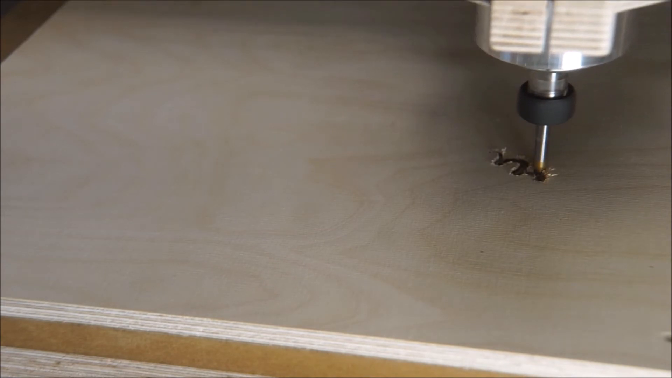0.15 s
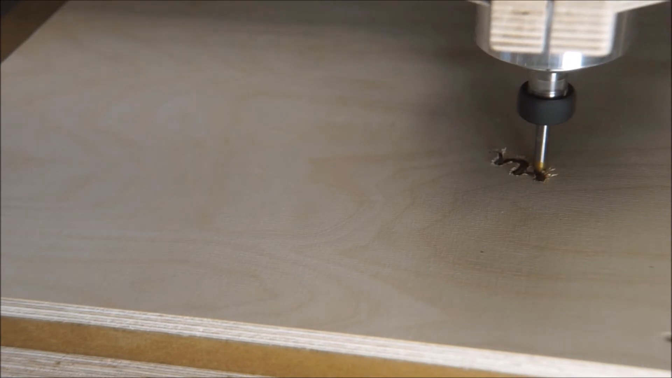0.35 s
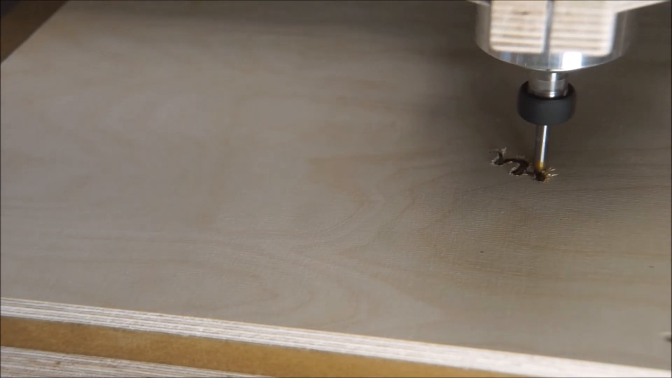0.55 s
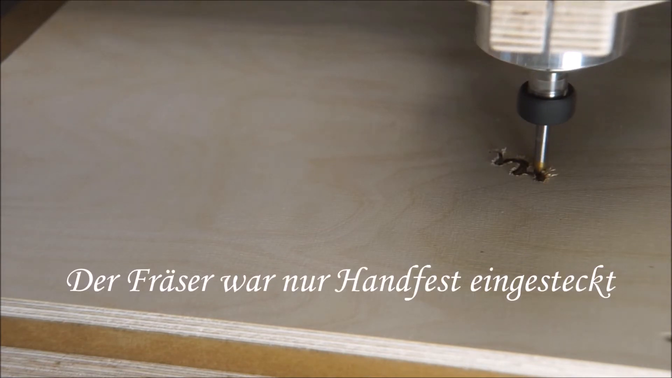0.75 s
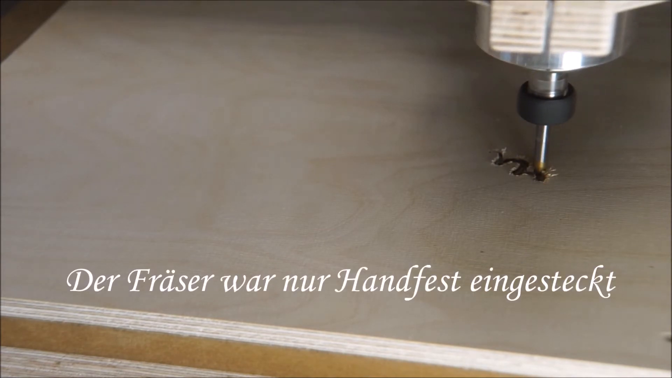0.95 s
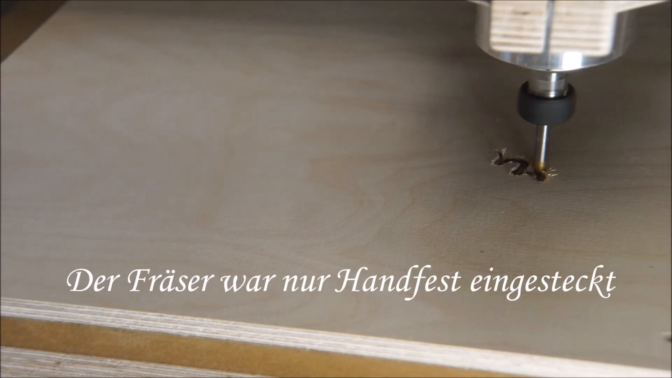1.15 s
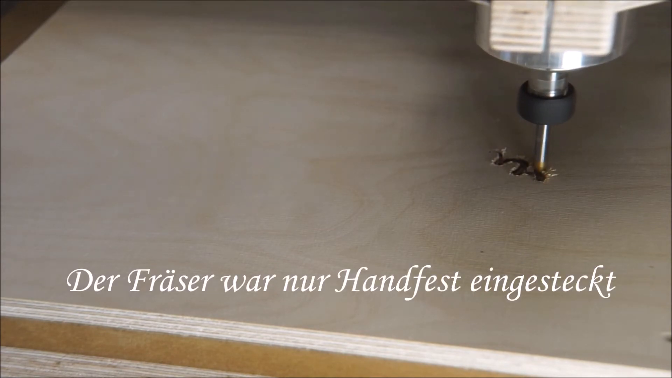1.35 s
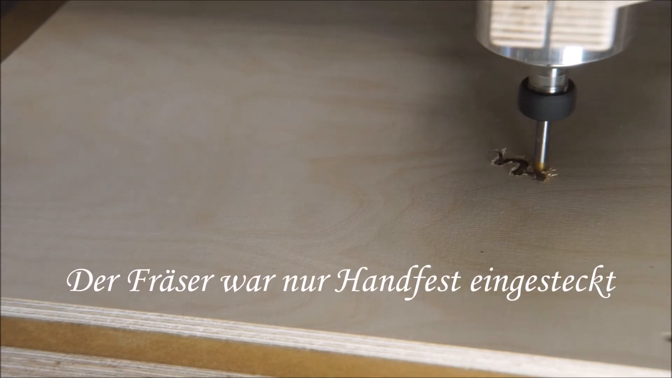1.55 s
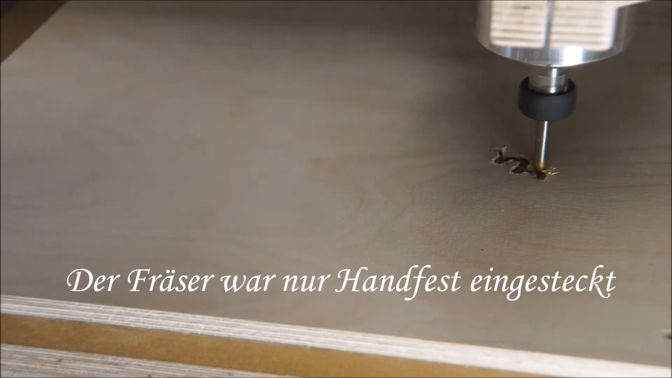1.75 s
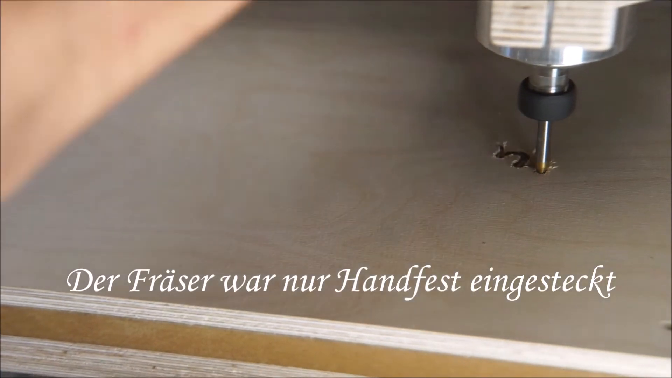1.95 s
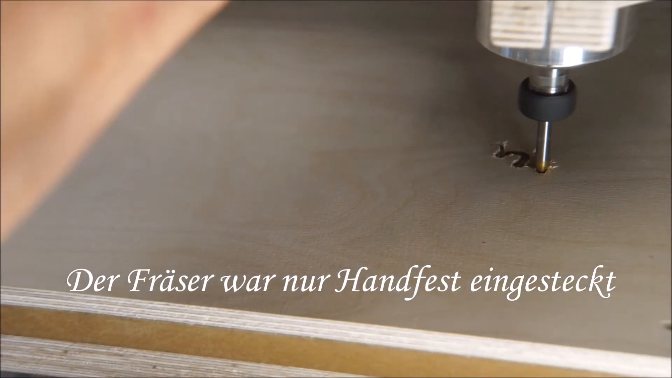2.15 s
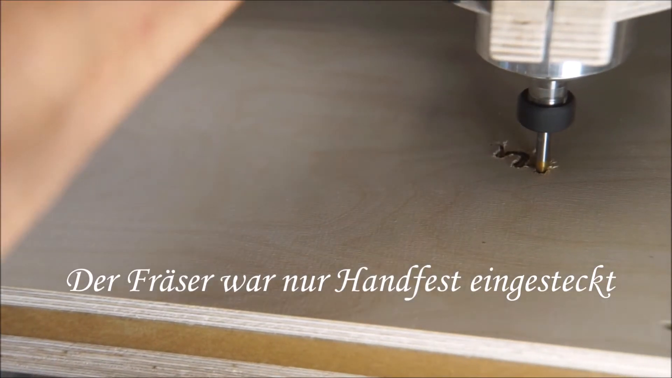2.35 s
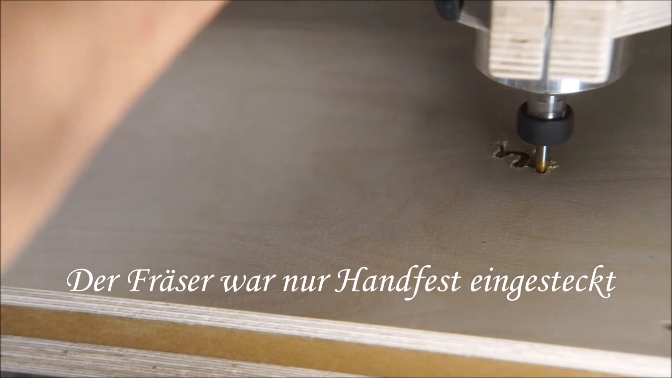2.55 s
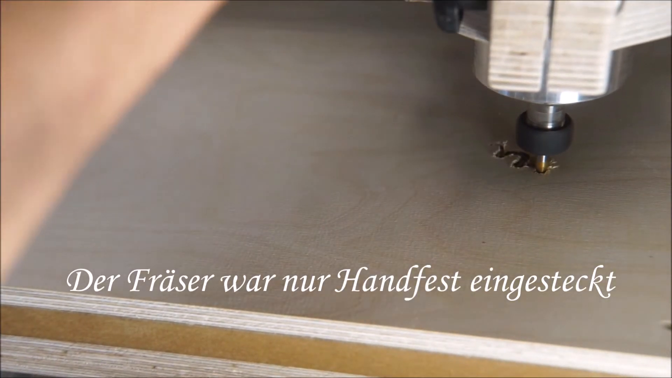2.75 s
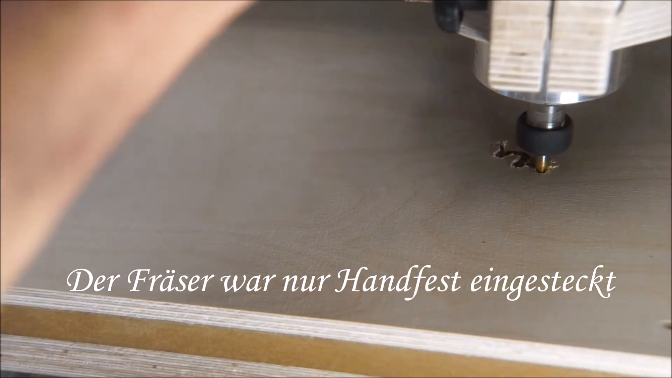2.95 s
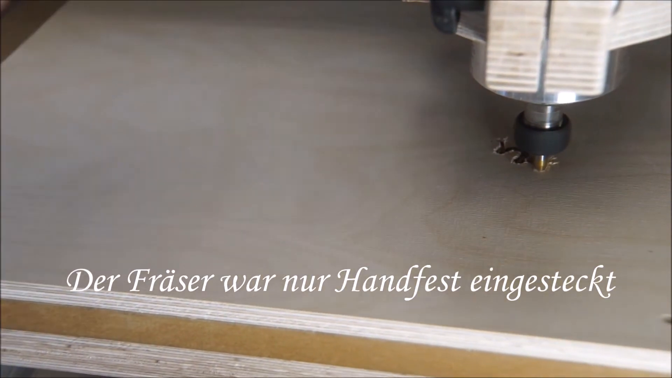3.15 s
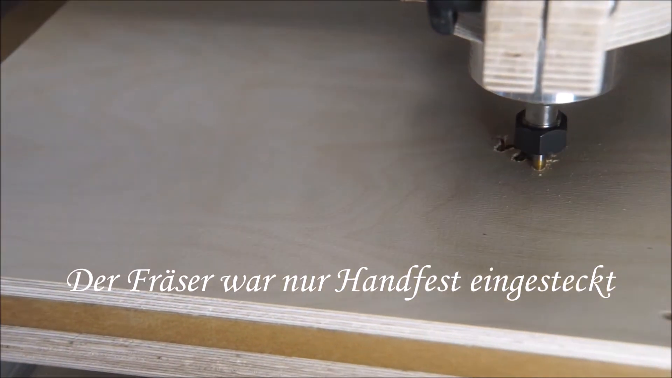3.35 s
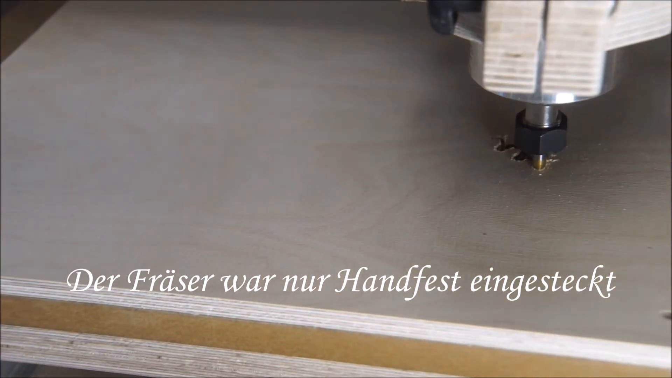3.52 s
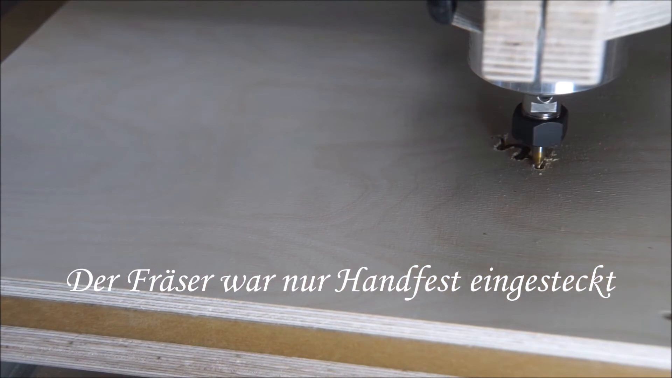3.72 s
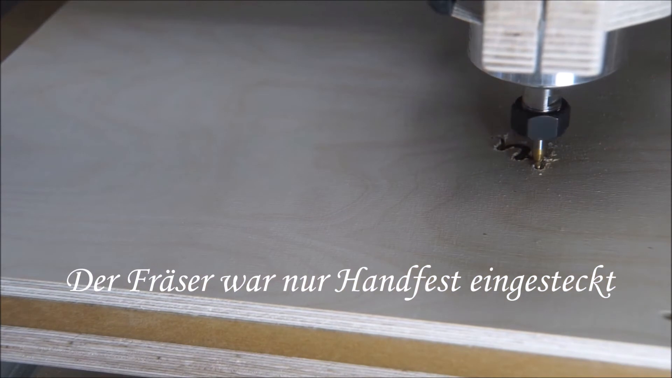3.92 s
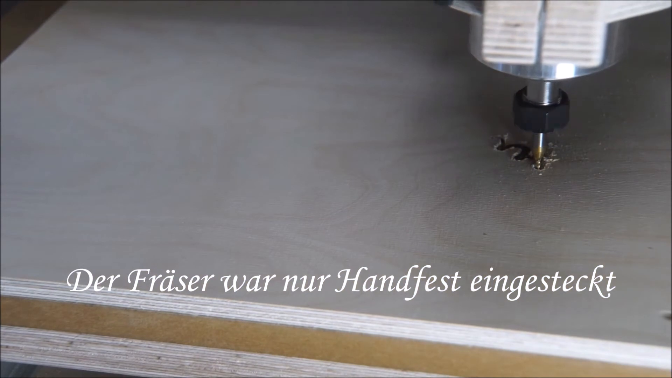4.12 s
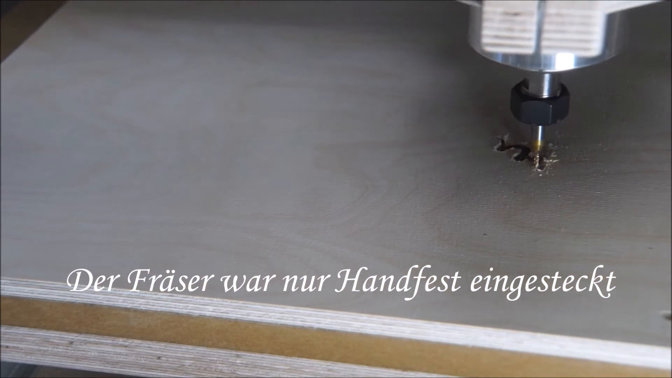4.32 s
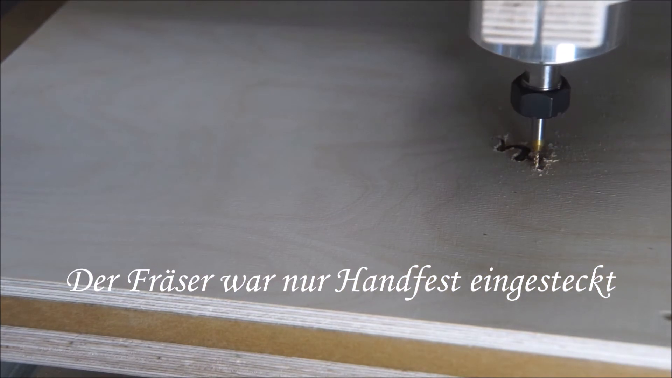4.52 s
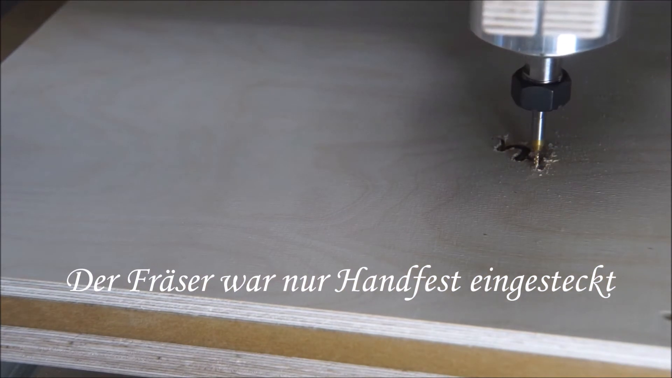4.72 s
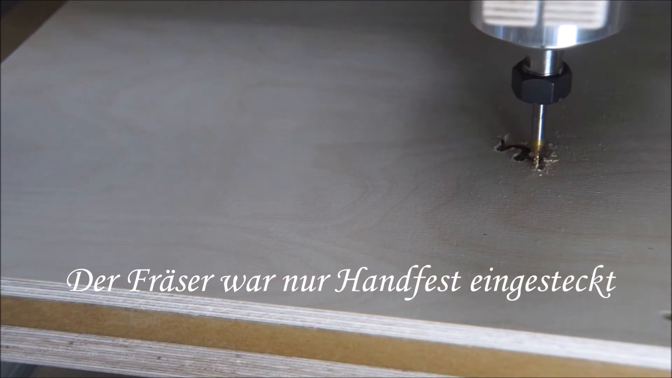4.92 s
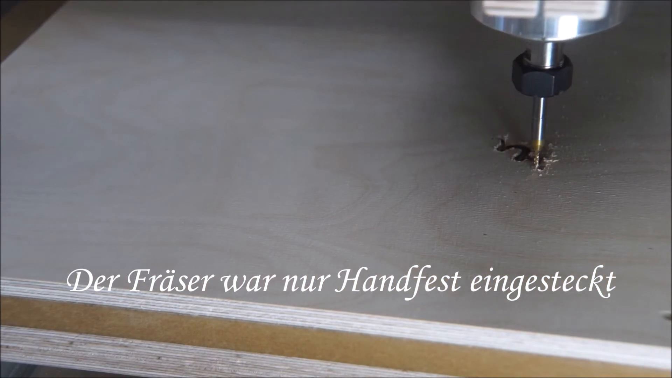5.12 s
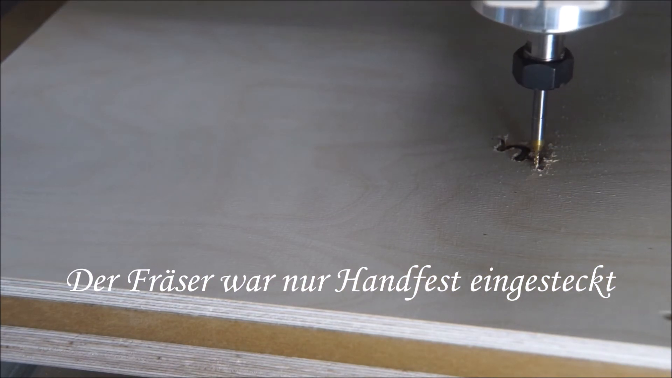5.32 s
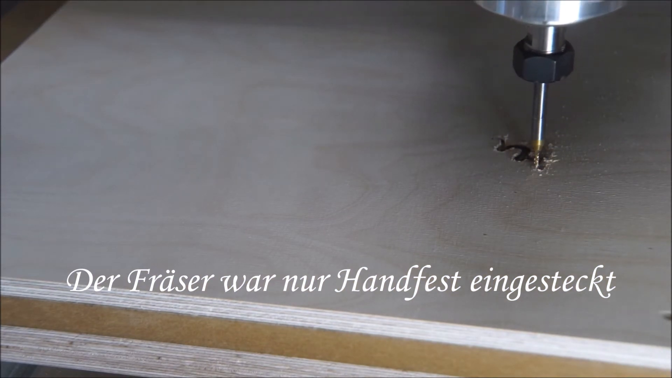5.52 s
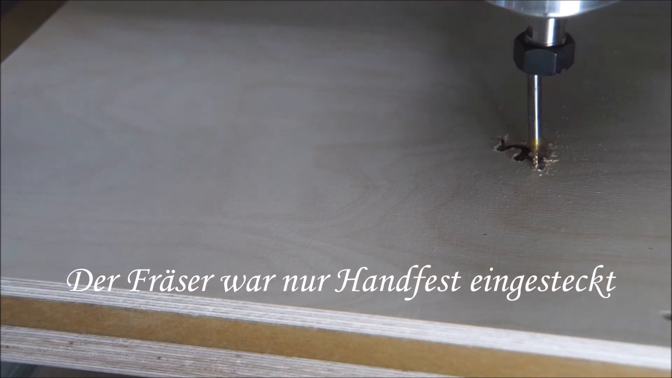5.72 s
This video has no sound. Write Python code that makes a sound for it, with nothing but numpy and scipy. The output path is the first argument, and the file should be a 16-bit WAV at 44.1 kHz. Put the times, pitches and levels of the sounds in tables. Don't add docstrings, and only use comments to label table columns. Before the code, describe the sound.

A small router whines and hisses as its loose bit judders in plywood, coasts down, rubs to a creaking stall, then a stepper motor hums.

```python
import sys
import numpy as np
from scipy import signal
from scipy.fft import rfft, irfft, next_fast_len
from scipy.io import wavfile
from scipy.ndimage import uniform_filter1d

SR = 44100
rng = np.random.default_rng(int(sys.argv[2]) if len(sys.argv) > 2 else 0)


def ratio(d):
    e = np.asarray(d, float) / 20
    return 10 ** e


def persist_wave(psi):
    counts = np.round(np.clip(psi, -1, 1) * 32767).astype(np.int16)
    wavfile.write(sys.argv[1], SR, np.atleast_2d(counts).T)


N = 254445
T = np.arange(N) / SR
FULL_HZ = 993.2
CHANGE_S = 3.672

# time_s, level_db
SHAKE = [(0, -1), (.4, 0), (.47, 0.5), (.6, -0.5), (.8, 0), (1.13, 0), (1.33, 3.5), (1.46, -0.5),
         (1.66, -1.5), (1.78, 2), (1.87, -0.5), (1.94, 3.5), (2.13, -0.5), (2.9, 1.5), (3.135, 0),
         (3.16, -5), (3.22, -21)]
# rotation_hz, level_db
MOUNT = [(300, -48), (440, -37.5), (555, -42), (660, -47.5), (740, -37), (825, -32.5), (940, -26.5),
         (993, -31)]
# rotation_hz, level_db
SECOND_MOUNT = [(400, -46), (520, -48), (555, -56), (600, -51), (690, -45), (770, -41), (875, -39),
                (910, -54), (945, -35), (993, -38)]
# centre_hz, width_hz
CANCELLED = [(888, 36), (766, 18), (696, 8), (604, 10), (584, 5), (503, 14)]
UPPER_ORDERS = [3, 4, 5, 6, 8, 9, 12]
UPPER_DB = [-50, -50, -49, -52, -53, -56, -53]
# freq_hz, gain_db
HOUSING = [(1500, 2), (1900, -1), (2250, 7), (2600, 0), (2980, 4), (3150, 5), (3600, -1), (4600, -3),
           (6500, 1), (7300, -4), (7950, 0), (9300, -9), (9900, 0), (12000, 0)]
# freq_hz, density_db_per_hz
HISS = [(80, -62), (300, -61), (650, -47), (850, -18.5), (1200, -20), (1600, -15), (2100, -9.5), (2900, -5),
        (4300, -12.5), (6000, -13.5), (9000, -17), (11800, -17), (15500, -21.5)]
# freq_hz, width_hz, gain_db
TABLE_MODES = [(602, 5.4, 9.5), (300, 34, -8.5), (784, 26, 8.5)]
# time_s, depth_db, brightness_db
CUT = [(0, -45.5, 15), (.26, -39, 12), (.55, -31.5, 7), (.85, -24, -1.5), (1.2, -21.5, -5.5),
       (1.35, -21.5, -2.5), (1.52, -23.5, -0.5), (1.67, -21, -2), (1.85, -23, -5.5), (2.1, -25.5, -4.5),
       (2.4, -24.5, -6.5), (3.02, -26, -12.5), (3.05, -21.5, -6)]
# freq_hz, width_hz, gain_db
FRAME_MODES = [(1500, 300, -6.5), (2000, 113, -2.5), (2320, 114, -0.5), (2818, 117, 3.5), (3150, 80, 2.5),
               (3660, 650, -11)]
# freq_hz, width_hz, gain_db
BIT_MODES = [(4250, 210, -1), (4890, 300, 3.5), (6060, 1020, 3.5), (11600, 1100, -4)]
# start_s, length_s, level_db
SKIPS = [
    (1.245, .085, -11),
    (1.632, .014, -10),
    (1.685, .06, -12),
    (1.79, .03, -5),
    (1.86, .01, -6),
    (1.96, .05, -5),
    (2.42, .04, -4),
]
# freq_hz, density_db_per_hz
SHOP = [(18, -67), (30, -31), (120, -19), (355, -14.5), (422, -12), (691, -11), (842, -1), (2210, -15),
        (2560, -12), (3120, -19), (3360, -19.5), (11000, -22), (14300, -48), (22000, -120)]
# freq_hz, side_minus_mid_db
SHOP_SIDE = [(40, -20), (120, 0), (250, -13), (900, -3), (1300, -6.5), (4000, -3), (11000, -3)]
# time_s, beat_hz, level_db
SING = [
    (0, 1360, 2),
    (.1, 1350, 2),
    (.2, 1339, 4),
    (.25, 1337, 1.5),
    (.27, 1325, -6),
]
SQUEAL_PAIRS = [(1, 0), (2, 0), (3, 0), (4, 0), (7, 0), (1, 1), (2, 1), (3, 1), (2, 2), (3, 2), (1, 5),
                (2, 4), (6, 1)]
SQUEAL_DB = [-36, -33, -39, -36, -51, -37, -50, -41, -49, -48, -47, -42, -48]
# time_s, rate_hz, level_db, upper_orders_db
CHATTER = [
    (.262, 1024, -30, 2.5),
    (.44, 1014, -29.5, 6),
    (.66, 1033, -28.5, 3.5),
    (.74, 1004, -28.5, 2.5),
    (.83, 1031, -30.5, 0.5),
    (1.0, 1042, -30, 3),
    (1.15, 1047, -29, 3),
    (1.22, 985, -32, -10),
    (1.26, 980, -60, -6),
]
# multiple, level_db
JUDDER_ORDERS = [(1, -13.5), (2, -1), (3, 0), (4, -15.5), (5, -5.5), (6, -8), (7, -15), (8, -17), (9, -18),
                 (11, -24)]
# time_s, level_db
STUMBLES = [
    (.468, -9),
    (.643, -7),
    (.692, -10),
    (1.035, -8),
]
# start_s, length_s, centre_hz, level_db
GRAZES = [(1.23, 0.022, 1450, -44), (1.339, 0.027, 1900, -37), (1.58, .03, 830, -47),
          (1.629, .02, 835, -44), (1.6, 0.037, 1810, -36), (1.761, 0.022, 1500, -38.5),
          (1.828, 0.038, 1490, -36.5), (1.89, .015, 1800, -42), (2.075, .03, 815, -47),
          (2.1, .04, 1380, -41), (2.197, 0.015, 1310, -40), (2.25, .015, 1500, -45),
          (2.537, .025, 2000, -36), (2.603, 0.013, 1900, -39), (2.816, .012, 1380, -39)]
# time_s, pitch_hz, level_db
HOWL = [
    (1.33, 2750, -40),
    (1.36, 3130, -31.5),
    (1.41, 2760, -36),
    (1.45, 2884, -34),
    (1.5, 2917, -29),
    (1.55, 2954, -36),
    (1.6, 2790, -28.5),
    (1.635, 2740, -34),
    (1.675, 2830, -31),
]
# time_s, level_db, grit_db
RUB = [
    (3.02, -60, -20),
    (3.043, -38, -9),
    (3.056, -25.5, 3),
    (3.104, -25, -4),
    (3.122, -22, -12),
    (3.15, -27, -2.5),
    (3.195, -28, 0),
    (3.238, -36.5, -5),
    (3.275, -54.5, 6),
]
# multiple, level_db
RUB_ORDERS = [(2, -13), (3, -5), (4, -1), (5, -6), (6, -9), (7, -6), (8, -1), (9, -11), (10, -10),
              (11, -11), (12, -3), (13, -9), (14, -14), (15, -12), (16, -12), (18, -16)]
# freq_hz, width_hz, gain_db
BOARD_MODES = [(950, 29, 4), (1474, 36, 13), (1620, 82, 7), (2030, 110, 7.5), (2640, 78, -2), (3250, 72, 6),
               (5350, 150, 6), (5960, 60, 3), (6300, 36, -10)]
# start_s, length_s, start_hz, end_hz, level_db
GROANS = [(3.15, .03, 1500, 1490, -33), (3.19, .06, 1490, 1490, -35), (3.2, .02, 700, 650, -38),
          (3.225, .018, 900, 800, -39), (3.186, .02, 930, 900, -31), (3.289, .05, 1490, 1480, -36),
          (3.308, .03, 900, 950, -35), (3.339, .016, 990, 1000, -28), (3.355, .018, 990, 980, -33),
          (3.37, .035, 850, 830, -41), (3.39, .05, 1040, 1080, -39), (3.35, .065, 410, 390, -43),
          (3.42, .03, 570, 560, -41), (3.458, .03, 570, 550, -38), (3.494, .018, 580, 580, -40),
          (3.49, .04, 960, 940, -43), (3.287, .03, 3000, 2950, -42), (3.365, .025, 5850, 5820, -48),
          (3.525, .035, 5800, 5800, -50), (3.592, .018, 5800, 5800, -54), (3.555, .03, 3900, 3850, -56),
          (3.56, .07, 760, 790, -54), (3.63, .04, 800, 830, -56)]
# start_s, length_s, level_db, bass_db
RATTLE = [
    (3.284, 0.11, -40.5, -1.5),
    (3.414, 0.099, -43, 0),
    (3.528, 0.14, -50, -4.5),
]
# freq_hz, width_hz, gain_db
RATTLE_MODES = [(586, 310, -3), (990, 180, 0.5), (1380, 240, -1.5), (1820, 260, 6), (2620, 740, 1),
                (3740, 21, -2), (3900, 37, -8), (5940, 220, -8), (6480, 90, -8.5), (7150, 29, -9)]
# time_s, peak_db, low_hz, high_hz, t60_s
KNOCKS = [
    (3.291, -43, 1450, 2950, 0.07),
    (3.421, -34, 1130, 2580, 0.055),
    (3.744, -25.5, 810, 1500, 0.053),
    (3.755, -31.5, 333, 1480, 0.05),
    (3.767, -38, 297, 520, .07),
    (4.225, -27, 870, 2550, 0.046),
    (4.232, -27.5, 1470, 2890, 0.055),
    (4.229, -38, 4300, 5000, .04),
]
# time_s, peak_db
TICKS = [(3.312, -36), (3.324, -26), (3.392, -27), (3.423, -26), (3.442, -32), (3.448, -27), (3.466, -26),
         (3.474, -26), (3.495, -28), (3.499, -34), (3.518, -33)]
# multiple, level_db
STEP_ORDERS = [(14, -24), (28, -18), (29, -8), (30, -14), (31, -5), (32, -13), (33, -7), (34, -19),
               (35, -13), (43, -19), (47, -19), (51, -10)]
FAINT_ORDERS = [1, 3, 5, 9, 11, 18, 21, 23, 24, 36, 37, 39, 40, 41, 42, 44, 45, 48, 49, 50, 52]
# multiple, pulling_db, free_db, swell_0_1, loudest_s
SWELLING = [(2.01, -52, -56.5, 0.22, 3.98), (4, -47, -54.5, 0.02, 3.99), (8, -59, -58.5, 0.33, 3.98),
            (10, -73, -65, 1, 3.96), (12.02, -65, -52.5, 0.41, 3.92), (16, -60, -57, 0.09, 3.9),
            (19.96, -71, -67.5, 0.3, 3.9), (27, -56, -65, 0.07, 3.9), (25, -81, -67, .1, 3.9)]
# multiple, start_s, length_s, level_db
SURGES = [(4, 4.17, .125, 3), (4, 4.2, .095, 2.5), (8, 4.91, .03, 3), (8, 5.3, .04, -6), (10, 5.27, .1, 8),
          (4, 4.38, .09, -9), (4, 4.62, .2, 3), (4, 4.79, .03, 2), (4, 4.84, .06, -4), (4, 5.38, .04, 4),
          (4, 5.2, .1, -3), (4, 5.66, .03, -5), (8, 4.22, .03, 6), (8, 5.39, .4, 6), (12, 4.15, .1, 8),
          (12, 4.94, .1, -5), (12, 4.7, .12, -2), (8, 4.33, .06, -5), (8, 5.05, .08, -3), (12, 5.26, .5, 2),
          (2, 4.19, .1, -8), (2, 4.33, .11, -3), (27, 4.22, .1, -7), (16, 4.22, .08, 5), (16, 3.7, .07, -5),
          (16, 4.66, .03, -6), (16, 5.36, .04, -5), (16, 4.9, .05, -3)]
# freq_hz, level_db
FAN_LINES = [(1753, -65.5), (2885, -71)]
# freq_hz, quarter_cycle_late_side_db
STEPPER_SIDE = [(420, -13), (840, -5.5), (1680, -6.5), (2520, -12), (3360, -11), (6500, -4.5), (10700, -12)]
# freq_hz, left_minus_right_db
STEPPER_LEAN = [(420, -1.5), (840, -3.5), (1680, -2), (2520, 5.5), (3360, -3.5), (6500, -1.5),
                (10700, -0.5)]
# time_s, rumble_db, fade_db_per_s
JERKS = [
    (3.674, -50.5, 270),
    (3.743, -48.5, 93),
    (4.232, -63, 400),
]
# freq_hz, side_minus_mid_db
SIDE_SHARE = [(40, -22), (130, -16), (300, -19), (600, -18), (900, -14), (1500, -11), (3000, -10),
              (6000, -6), (10000, -3), (15000, -2)]
# freq_hz, left_minus_right_db
LEAN = [(300, 0.5), (800, -.5), (1400, -2.5), (2800, -2.5), (6000, -1.5), (12000, -2)]


def curves(table):
    s, *cols = np.transpose(table)
    gate = np.clip(np.minimum(T - s[0] + 0.0028, s[-1] + 0.014 - T) / 0.0019, 0, 1)
    return [np.interp(T, s, c) for c in cols], gate


def hold(start, length, attack, release):
    return np.clip(np.minimum((T - start) / attack, (start + length - T) / release + 1), 0, 1)


def unit(x):
    return x / np.sqrt(np.mean(x ** 2) + 1e-30)


def shape(x, points, scale=1):
    hz, db = np.transpose(points)
    size = next_fast_len(len(x))
    f = np.maximum(np.fft.rfftfreq(size, 1 / SR), 1)
    gain = ratio(scale * np.interp(np.log(f), np.log(hz), db))
    return irfft(rfft(x, size) * gain, size)[:len(x)]


def ring(x, modes):
    return sum((-1) ** k * ratio(db) * signal.lfilter(*signal.iirpeak(hz, hz / width, SR), x)
               for k, (hz, width, db) in enumerate(modes))


def band(x, lo_hz, hi_hz):
    return unit(signal.sosfilt(signal.butter(3, [lo_hz, hi_hz], "band", fs=SR, output="sos"), x))


def walk(rate, size=N):
    at = np.arange(size) * rate / SR
    levels = rng.standard_normal(int(np.ceil(at[-1] + 2)))
    return 1.4 * np.interp(at, np.arange(at[-1] + 2), levels)


def tone(turns, order, db, waver_db=2, rate=12, scatter=1):
    level = ratio(db + waver_db * walk(rate, size=len(turns)))
    return np.sqrt(2) * level * np.sin(2 * np.pi * (order * turns + scatter * rng.random()))


def grit(rate, spread_db):
    hits = rng.random(N) < rate / SR
    return unit(hits * rng.standard_normal(N) * ratio(spread_db * rng.exponential(size=N)))


def speed():
    off_s, coast_tau_s, friction_hz = 2.133, 1.82, 242.7
    touch_s, brake_hz_per_s, brake_curve, crawl_hz = 3.063, 2230, 1.15, 153
    coast = (FULL_HZ + friction_hz) * np.exp(-np.maximum(T - off_s, 0) / coast_tau_s) - friction_hz
    brake = brake_hz_per_s * np.maximum(T - touch_s, 0) ** brake_curve
    hz = np.maximum(coast - brake, crawl_hz)
    return uniform_filter1d(hz, size=1024) * (1 + 0.00081 * walk(39.9))


def contact():
    edge_s, back_s = .008, .016
    return .9 * walk(29.98) + sum(db * hold(s, length, edge_s, back_s) for s, length, db in SKIPS)


def spindle(turns, hz):
    cancel_floor = .02
    seated_db = -30
    upper_fall = .55
    (shake_db,), on = curves(SHAKE)
    slow_db = 35 * np.log10(hz / FULL_HZ)
    tone_db = shake_db + np.interp(hz, *np.transpose(MOUNT))
    for f, width in CANCELLED:
        tone_db += 10 * np.log10(1 + cancel_floor - 1 / (1 + ((hz - f) / width) ** 2))
    second_db = np.interp(hz, *np.transpose(SECOND_MOUNT)) + seated_db * (T < CHATTER[0][0]) + shake_db
    lines = tone(turns, 1, tone_db, waver_db=.5) + tone(turns, 2, second_db, waver_db=1.5)
    for k, db in zip(UPPER_ORDERS, UPPER_DB):
        upper_db = db + upper_fall * slow_db + np.interp(k * hz, *np.transpose(HOUSING))
        lines += tone(turns, k, upper_db, waver_db=2.2, rate=25)
    runout = ratio(tone_db - 25.0) * walk(150) * np.sin(2 * np.pi * turns)
    return on * (lines + runout)


def air(hz, grip_db):
    hiss_db, rub_hiss_db, hum_db, rub_hum_db = -34.5, -15, -67, -35
    stall_s, skip_share = 3.25, .13
    (rub_db, _), rub = curves(RUB)
    spin = hold(-1, stall_s + 1, .01, 0.0086) * (hz / FULL_HZ)
    buried_db = -3.5 * hold(.26, .42, 0.025, 0.047)
    hiss = spin * ratio(hiss_db + skip_share * grip_db + buried_db) + rub * ratio(rub_db + rub_hiss_db)
    hiss *= ratio(6 + .5 * walk(11.06))
    hum = spin * ratio(hum_db + 5.6 * walk(21.16)) + rub * ratio(rub_db + rub_hum_db)
    table = band(ring(rng.standard_normal(N), TABLE_MODES), 263, 750)
    return hiss * unit(shape(rng.standard_normal(N), HISS)) + hum * ratio(0.5) * table


def cutting(turns, grip_db):
    (db, bright_db), on = curves(CUT)
    bite = 1 + .5 * np.cos(2 * np.pi * turns)
    chips = bite * (rng.standard_normal(N) + .6 * grit(1500, 2))
    db = db + .8 * walk(25)
    body = unit(ring(chips, FRAME_MODES)) + ratio(bright_db + 1.5) * unit(ring(chips, BIT_MODES))
    return on * ratio(db + grip_db - 8.5) * body


def shop():
    level = ratio(-54.5 + .7 * walk(4) + .8 * walk(15))
    hum = level * unit(shape(rng.standard_normal(N), SHOP))
    late = np.clip((T - CHANGE_S) / 0.014, 0, 1)
    early = ratio(-6.5) * shape(hum, [(80, -35), (200, -20), (400, 0)])
    return (1 - late) * early + late * hum


def squeal(turns):
    (hz, db), on = curves(SING)
    live = on > 0
    beats = np.cumsum(hz[live]) / SR
    song = sum(tone(m * beats + n * turns[live], 1, d, waver_db=.6, rate=32.0)
               for (m, n), d in zip(SQUEAL_PAIRS, SQUEAL_DB))
    on[live] *= ratio(db[live]) * song
    return on


def chatter(turns):
    uneven, wander = .38, .007
    throb, stumble_s = .3, .004
    cols, on = curves(CHATTER)
    live = on > 0
    hz, db, bright_db = (c[live] for c in cols)
    size = len(hz)
    rate_hz = hz * (1 + .006 * uneven * walk(500, size=size) + wander * walk(220, size=size))
    beats = np.cumsum(rate_hz) / SR
    orders = 0
    for k, d in JUDDER_ORDERS:
        line = tone(beats - .25 / k, k, d + bright_db * (k > 3), waver_db=1, rate=40, scatter=.15)
        orders = orders + line * (1 - uneven + uneven * walk(450, size=size))
    on *= ratio(sum(d * hold(s, stumble_s, stumble_s, stumble_s) for s, d in STUMBLES))
    flutes = 1 + throb * np.cos(2 * np.pi * 2 * (beats - turns[live]))
    on[live] *= ratio(db - 0.5) * flutes * orders
    return on


def grazes():
    octaves, edge_s = 0.25, .006
    out = np.zeros(N)
    for s, length, hz, db in GRAZES:
        at = slice(int((s - .01) * SR), int((s + length + .03) * SR))
        scrape = band(rng.standard_normal(4096), hz / 2 ** octaves, hz * 2 ** octaves)
        envelope = hold(s, length, edge_s / 2, edge_s * 2)[at]
        out[at] += ratio(db) * envelope * scrape[:at.stop - at.start]
    return out


def howl():
    (hz, db), on = curves(HOWL)
    live = on > 0
    size = live.sum()
    turns = np.cumsum(hz[live] * (1 + .012 * walk(80, size=size))) / SR
    on[live] *= sum(tone(turns, k, db[live] + d, waver_db=2, rate=40) * (.6 + .5 * walk(200, size=size))
                    for k, d in ((1, 0), (.86, -5)))
    return on


def rubbing(turns):
    low_fade_db_per_s, high_fade_db_per_s = -260, -50
    (db, grit_db), on = curves(RUB)
    fade_db = -60 * np.clip(T - 3.09, 0, 1)
    late_s = np.clip(T - 3.15, 0, .2)
    orders = 0
    for k, d in RUB_ORDERS:
        order_db = d + (grit_db + 5.5 + fade_db) * (k > 9)
        order_db = order_db + late_s * (low_fade_db_per_s if k < 5 else high_fade_db_per_s)
        orders = orders + tone(turns, k, order_db, waver_db=1.35, rate=60)
    scrape = .3 * unit(ring(rng.standard_normal(N), BOARD_MODES)) + .24 * band(grit(1500, 1), 450, 4000)
    rasp = .8 * orders + .9 * ring(orders, BOARD_MODES) + scrape
    rasp /= np.sqrt(uniform_filter1d(rasp ** 2, 2048))
    return on * ratio(db) * (rasp + ratio(grit_db - 8.0) * band(rng.standard_normal(N), 2900, 8400))


def groans():
    out = np.zeros(N)
    for s, length, start_hz, end_hz, db in GROANS:
        part = np.linspace(0, 1, int(length * SR))
        at = int(s * SR)
        turns = np.cumsum(start_hz + (end_hz - start_hz) * part) / SR
        creak = tone(turns, 1.0, db - 2.0, waver_db=0.5, rate=103)
        out[at:at + len(part)] += np.sqrt(np.sin(np.pi * part)) * creak
    return out


def rattle():
    attack_s, release_s = 0.0073, 0.031
    body = ring(grit(4000, 1) + rng.standard_normal(N), RATTLE_MODES) + .08 * grit(3000, 1)
    low, mid = band(body, 250, 1420), band(body, 1490, 2650)
    fizz = ratio(-14.0) * band(rng.standard_normal(N), 9200, 13100)
    high = ratio(-5.5) * (band(body, 3500, 9500) + fizz)
    shudders = sum(hold(s, length, attack_s, release_s) * ratio(db) * (ratio(bass_db) * low + mid + high)
                   for s, length, db, bass_db in RATTLE)
    return ratio(2.2 * walk(120)) * shudders


def knocks():
    out, t = np.zeros(N + 8192), np.arange(8192) / SR
    for s, db, low_hz, high_hz, t60 in KNOCKS:
        fade = np.exp(-np.log(1000) * t / t60) * np.minimum(t / 0.00083, 1)
        crack = 0.86 * fade * band(rng.standard_normal(8192), 260, 3400)
        crack += .1 * fade ** 3 * rng.standard_normal(8192)
        modes = np.sin(2 * np.pi * low_hz * t) + 0.76 * np.sin(2 * np.pi * high_hz * t)
        out[int(s * SR):int(s * SR) + 8192] += ratio(db - 12.0) * (fade * modes + crack)
    return shape(out[:N], [(60, -32), (250, 7.5), (8000, -8.5), (14000, -12)])


def ticks():
    t60_s = 0.025
    out, fade = np.zeros(N), np.exp(-np.log(1000) * np.arange(2048) / SR / t60_s)
    for s, db in TICKS:
        click = fade * band(rng.standard_normal(2048), 534, 2800)
        click += 0.32 * fade ** 8 * band(rng.standard_normal(2048), 1500, 7000)
        out[int(s * SR):int(s * SR) + 2048] += ratio(db - 5) * click
    return out


def stepper():
    step_hz, step_db, faint_db, steps_per_turn = 209.87, -55, -28, 50
    free_s, freeing_s, start_s = 4.31, .04, .1
    edge_s, drop_s = 0.024, .015
    waver_db, scatter = .6, .42
    late = T >= CHANGE_S
    t = T[late]
    steps = step_hz * t
    free = np.clip((t - free_s) / freeing_s + .5, 0, 1)
    start = np.clip(.5 + .5 * (t - CHANGE_S) / start_s, 0, 1)
    steady = list(STEP_ORDERS) + [(k, faint_db) for k in FAINT_ORDERS]
    song = sum(tone(steps, k, step_db + db, waver_db=waver_db, rate=9.9, scatter=scatter)
               for k, db in steady)
    for k, pull_db, free_db, swell, loud_s in SWELLING:
        db = pull_db + (free_db - pull_db) * free
        for m, s, length, d in SURGES:
            if m == round(k):
                db = db + d * hold(s - edge_s, length + edge_s, edge_s, drop_s)[late]
        dip = np.sin(np.pi * step_hz / steps_per_turn * (t - loud_s)) ** 2
        turn = 1 - np.clip(swell, 0, 1) * dip
        line = tone(steps, round(k), db, waver_db=waver_db, rate=10.93, scatter=scatter)
        song += turn * start * line
    fans = sum(tone(hz * t, 1, db) for hz, db in FAN_LINES)
    return np.r_[np.zeros(N - late.sum()), song + fans]


def drag():
    pull_s, slip_s, rumble_db, scratch_db, after_db = 3.75, 4.17, -59, -63, -11
    stick_slip_hz, stick_depth = 57.44, 0.53
    rumble = band(grit(1500, 1), 150, 620)
    slips = np.cumsum(stick_slip_hz * (1 + 0.1475 * walk(30))) / SR
    rumble *= 1 + stick_depth * np.cos(2 * np.pi * slips)
    scratch = band(rng.standard_normal(N), 9900, 11000) + .6 * band(rng.standard_normal(N), 5200, 7200)
    jerks = sum(hold(s, 1, 0.0038, .1) * ratio(db - fade * np.maximum(T - s, 0)) for s, db, fade in JERKS)
    after = ratio(after_db) * hold(slip_s, 0.16, .03, .15)
    pull = ratio(rumble_db) * (hold(pull_s, slip_s - pull_s, .01, 0.029) + after)
    scrape = hold(CHANGE_S, slip_s - CHANGE_S, 0.004, 0.048) + after
    scrape += .5 * hold(4.5, 0.044, .005, .04) - 0.55 * hold(4.04, 0.025, 0.022, .005)
    return ratio(-1.0) * (jerks + pull) * rumble + ratio(scratch_db + 2.5) * scrape * scratch


def scene():
    hz, grip_db = speed(), contact()
    turns = np.cumsum(hz) / SR
    rotor = spindle(turns, hz)
    clear = squeal(turns) + chatter(turns) + grazes() + howl() + rubbing(turns)
    clear += groans() + rattle() + knocks() + ticks()
    steps = stepper()
    mid, wide = (air(hz, grip_db) + cutting(turns, grip_db) + drag() for _ in range(2))
    echo = rng.standard_normal(4096) * np.exp(-np.arange(4096) / SR / 0.02)
    echo /= np.sqrt(np.sum(echo ** 2))
    walls = signal.fftconvolve(clear + .4 * rotor, echo)[:N]
    side = shape(walls + wide, SIDE_SHARE) + shape(shop(), SHOP_SIDE)
    mid = mid + rotor + clear + shop()
    quarter_late = signal.hilbert(steps, next_fast_len(N)).imag[:N]
    late = shape(quarter_late, STEPPER_SIDE)
    return np.array([shape(mid + way * side, LEAN, scale=way / 2)
                     + shape(steps + way * late, STEPPER_LEAN, scale=way / 2) for way in (1, -1)])


def roll_off(x):
    return signal.sosfilt(signal.butter(12, 16670, fs=SR, output="sos"), x)


def record(dry):
    bend, top_hz, late_top_hz = 0.12, 15750, 10950
    power = dry.mean(axis=0) ** 2
    bent = dry + bend * (uniform_filter1d(power, size=128) - uniform_filter1d(power, 4096))
    bent = signal.sosfilt(signal.ellip(8, .1, 60, top_hz, fs=SR, output="sos"), bent)
    dull = signal.sosfiltfilt(signal.ellip(8, .1, 40, late_top_hz, fs=SR, output="sos"), bent)
    return roll_off(np.where(T < CHANGE_S, bent, dull))


dry = scene()
out = record(dry)
persist_wave(out)
```